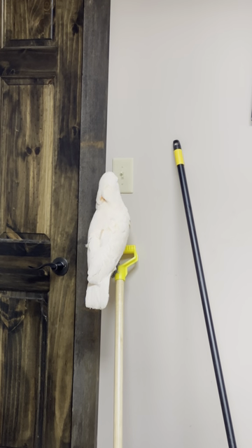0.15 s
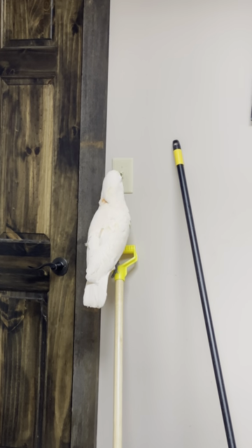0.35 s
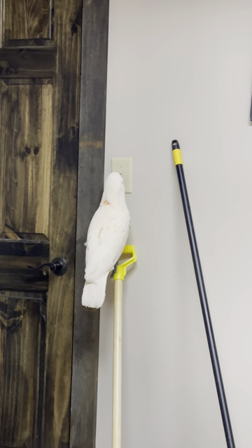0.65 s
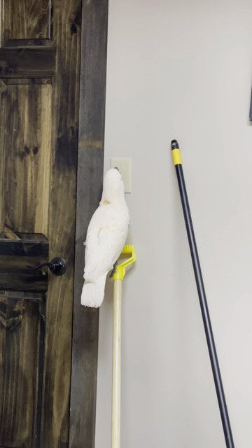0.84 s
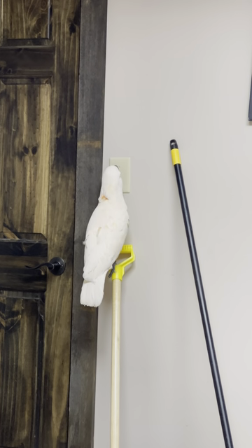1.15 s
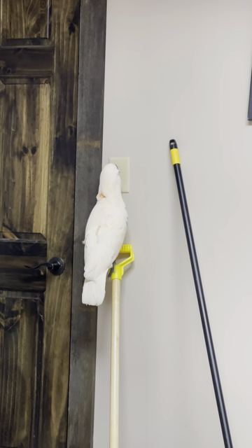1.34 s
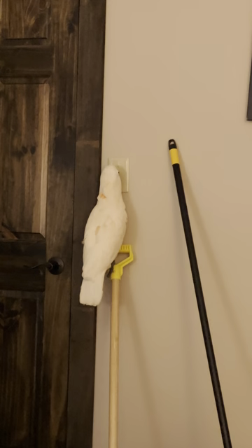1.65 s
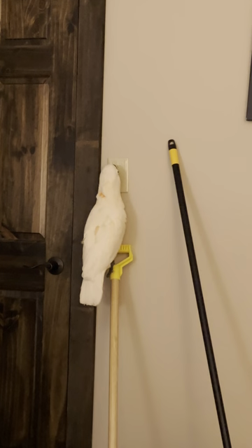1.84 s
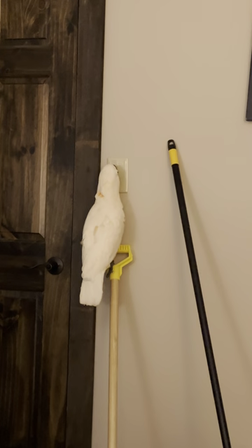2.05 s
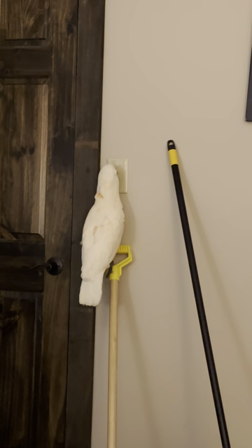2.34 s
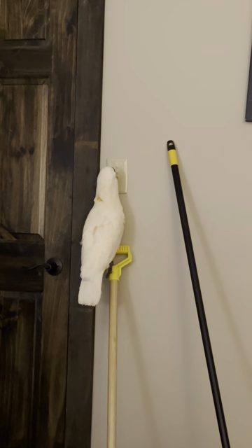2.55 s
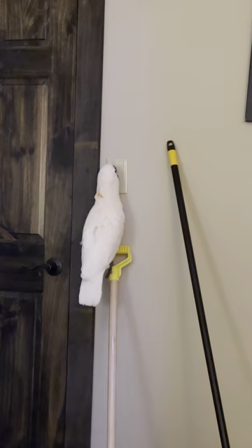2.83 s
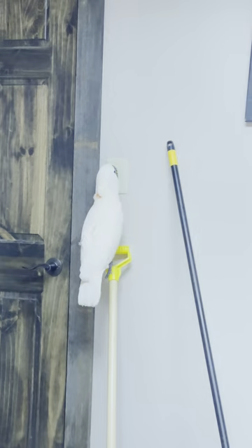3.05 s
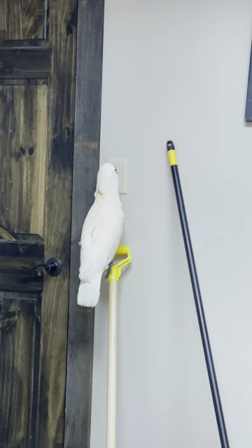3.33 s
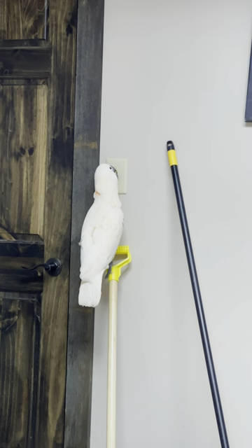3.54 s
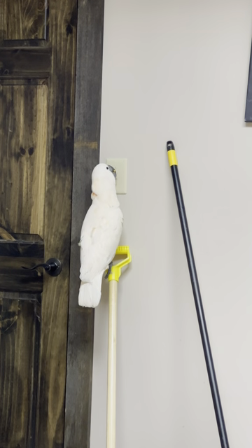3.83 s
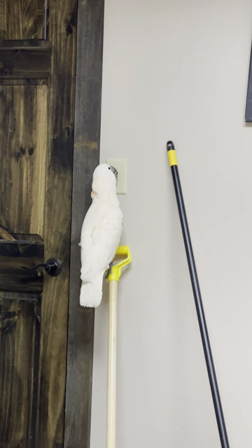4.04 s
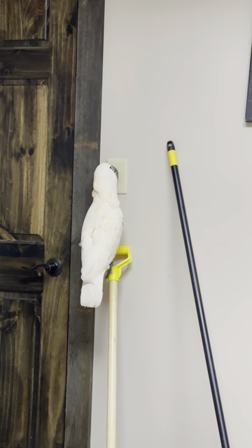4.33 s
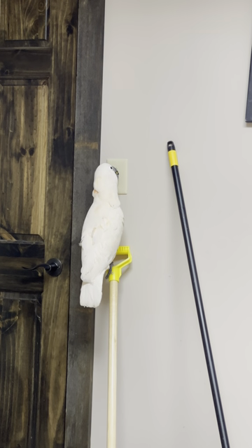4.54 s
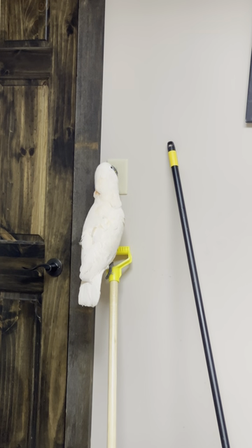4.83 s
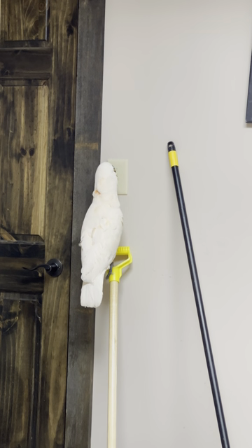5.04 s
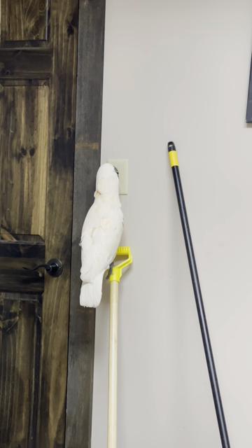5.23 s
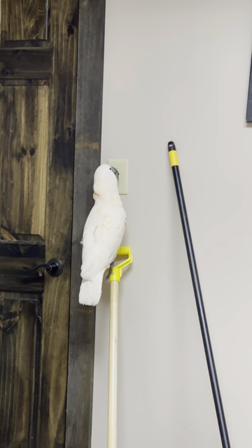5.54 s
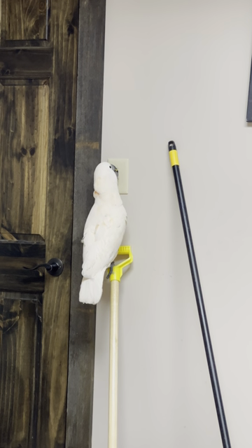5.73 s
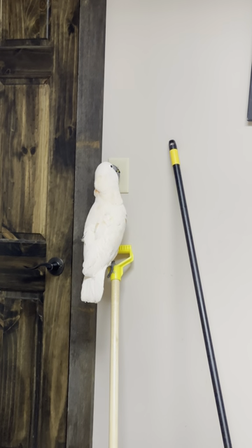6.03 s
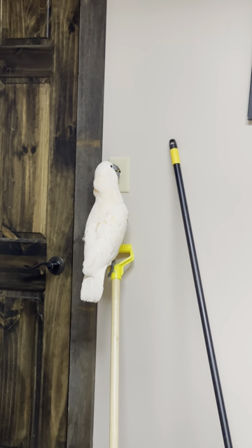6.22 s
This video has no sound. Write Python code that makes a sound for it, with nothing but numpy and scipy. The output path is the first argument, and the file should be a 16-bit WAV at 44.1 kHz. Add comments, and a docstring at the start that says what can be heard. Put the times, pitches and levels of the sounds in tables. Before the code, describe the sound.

A bird's beak clicks and scrapes on a plastic wall light switch in uneven runs, with sharp switch snaps and dull knocks indoors.

```python
"""A mop handle bumps the wall of a small bare room, over a low rumble and a thin electrical whine.
A cockatoo perched on it works a light switch with its beak, a few metres away. The beak clicks on the
plastic and the toggle knocks in the hollow wall; the spring cracks, and the toggle ticks against its
stop and once snaps right over. Each contact is a short force that excites the resonances of the parts
struck, heard as direct sound plus the reverberation of the room."""
import sys
import numpy as np
from scipy import signal
from scipy.fft import rfft, irfft, next_fast_len
from scipy.io import wavfile
from scipy.ndimage import uniform_filter1d

SR = 44100
rng = np.random.default_rng(int(sys.argv[2]) if len(sys.argv) > 2 else 0)


def log_audio(samples):
    """Write samples as a 16-bit WAV file to the path given in sys.argv[1]."""
    # one column per channel
    frames = np.atleast_2d(samples).T
    # limit to full scale, then quantise
    limited = np.clip(frames, -1, 1)
    pcm = np.round(limited * 32767).astype(np.int16)
    wavfile.write(sys.argv[1], SR, pcm)


N = 281358
SIZE, LEAD = 32768, 66  # samples in one contact, and in its fade-in before the strike
HZ = np.fft.rfftfreq(SIZE, 1 / SR)


def amp(db):
    """Amplitude ratio of a level in decibels."""
    return 10 ** (np.asarray(db) / 20)


def unit(x):
    """Normalisation to rms 1."""
    return x / np.sqrt(np.mean(x ** 2) + 1e-20)


def curve(points, hz):
    """Linear interpolation of (f/Hz, value) points on a log-frequency axis."""
    f, value = np.transpose(points)
    return np.interp(np.log(hz + 1), np.log(f + 1), value)


def add(mix, t, sound):
    """Superposition: a stereo contact joins the mix with its strike at t seconds."""
    part = mix[:, max(round(t * SR) - LEAD, 0):][:, :sound.shape[1]]
    part += sound[:, :part.shape[1]]


def minimum_phase(db):
    """Causality: phase follows from log gain by the Hilbert transform; a sharp start, then ringing."""
    log_gain = np.log(amp(np.maximum(db, -100)))
    mirrored = np.concatenate([log_gain, log_gain[-2:0:-1]])
    return np.exp(np.conj(signal.hilbert(mirrored)))[:len(db)]


def diffuse_field(size):
    """Spectrum of white stereo noise: sound from all sides is partly coherent at two points."""
    # likeness of left and right: f/Hz, coherence
    coherence = [(120, 1), (250, .93), (500, .82), (1100, .8), (1700, .98), (4200, .985), (4900, .8),
                 (5700, .985), (12000, .985)]
    a, b = rfft(rng.standard_normal((2, size)))
    alike = curve(coherence, np.fft.rfftfreq(size, 1 / SR))
    mid, side = a * np.sqrt((1 + alike) / 2), b * np.sqrt((1 - alike) / 2)
    return np.array([mid + side, mid - side])


def room(build_s=0.00054, bass_build_s=0.018, late_db=-27, late_t60=0.65):
    """Reverberation: reflections decay exponentially by band; the space beyond adds a longer tail."""
    # reverberation time: f/Hz, T60/s
    t60 = [(60, 0.42), (150, 0.4), (300, 0.29), (700, 0.27), (1500, 0.21), (3000, 0.22), (6000, 0.22),
           (12000, 0.11)]
    hz, t, bands = signal.stft(irfft(diffuse_field(SIZE)), SR, nperseg=256)
    hz = hz[:, None]
    late = amp(late_db - 60 * t / late_t60) / (1 + (hz / 2200) ** 2)
    bands *= amp(-60 * t / curve(t60, hz)) + late
    bands *= 1 - np.exp(-t / bass_build_s) / (1 + (hz / 450) ** 4)  # the bass builds up last
    tail = signal.istft(bands, SR, nperseg=256)[1][:, :SIZE]
    response = rfft(tail * (1 - np.exp(-np.arange(SIZE) / SR / build_s)))
    power = np.mean(abs(response) ** 2, 0)
    return response / np.sqrt(uniform_filter1d(power, size=60))  # even power over many room modes


def stick_slip(slip_s, catch, count=9):
    """Stick-slip force: an impact, then random catches of relative spread `catch`; whitened spectrum."""
    when, strength = rng.random(count), rng.standard_normal(count) * catch
    when[0], strength[0] = 0, 1
    force = rfft(np.bincount((when * slip_s * SR).astype(int), strength, minlength=SIZE))
    return force / np.sqrt(uniform_filter1d(abs(force) ** 2, size=90) + 1e-9)


def impact(spectrum, level_db, tilt, direct_db, pivot_hz, boom_db=0, room_db=0,
           slip_s=0, catch=0.62, ring=1, tone_hz=1000, tone_db=0, echo=0):
    """Source and filter: a force drives damped modes, heard directly and by reflection."""
    # resonances of the wall and switch plate: f/Hz, bandwidth/Hz, lift/dB
    modes = [(118, 8, 6), (153, 8, 8), (240, 12, 5), (348, 16, 9), (425, 12, 5), (479, 16, 7), (572, 16, 4),
             (667, 14, 6), (728, 16, 6), (820, 16, 5), (984, 12, 4), (1021, 16, 7), (1190, 50, 6),
             (1334, 20, 4), (1385, 16, 6), (1632, 20, 6), (1820, 50, 6), (2200, 28, 5), (2379, 27, 6),
             (2700, 34, 6), (3050, 36, 5), (4050, 90, 6)]
    # direct path past the bird's body: f/Hz, gain/dB
    direct_path = [(100, -5.5), (600, -8.5), (1400, 0), (2500, -23), (5000, 1.5), (10000, -5)]
    lift = sum((amp(db) - 1) / (1 + (2 * (HZ - hz) / width) ** 2) for hz, width, db in modes)
    colour_db = curve(spectrum, HZ) + ring * 20 * np.log10(1 + lift)
    colour_db += tilt * np.clip(np.log2((HZ + 1) / pivot_hz), -2, 2)  # harder is brighter
    colour_db += boom_db / (1 + (HZ / 260) ** 4)  # a deep push flexes the whole wall panel
    colour_db += tone_db / (1 + ((HZ / tone_hz - 1) / 0.061) ** 2)  # each spot has its own pitch
    direct = amp(direct_db + curve(direct_path, HZ))
    comb = 1 + echo * np.exp(-2j * np.pi * HZ * .0035)  # reflection off the nearest surface
    vibration = minimum_phase(colour_db) * stick_slip(slip_s, catch)
    sound = irfft(vibration * (direct * comb + amp(room_db) * room()))
    fade_in = np.sin(np.pi / 2 * np.minimum(np.arange(SIZE) / LEAD, 1)) ** 2
    fade_out = np.minimum(np.linspace(4, 0, SIZE), 1) ** 2
    sound = np.roll(sound, LEAD, axis=1) * fade_in * fade_out
    onset_rms = np.sqrt(np.mean(sound[:, :SR // 40] ** 2))
    return amp(level_db) * sound / onset_rms


def background(rumble_db=-54, fall_db_per_s=0.82, whine_db=-72):
    """Filtered noise: a slowly sinking house rumble, steady hiss and a narrow-band electrical whine."""
    # spectra of the room noise and of the whine: f/Hz, level/dB
    noise_spectrum = [(20, -8), (32, -19.5), (48, 3), (80, -2.5), (140, -2), (240, -10), (400, -20),
                      (800, -28), (1400, -40), (2500, -47.5), (4500, -50), (9000, -53.5), (11500, -99)]
    whine_spectrum = [(9400, -31), (9750, -4.5), (10020, 4), (10180, 20.5), (10340, 15.5), (10500, -7.5),
                      (10800, -33.5)]
    hz, t = np.fft.rfftfreq(N, 1 / SR), np.arange(N) / SR
    noise = unit(irfft(diffuse_field(N) * amp(curve(noise_spectrum, hz)), N))
    rumble = irfft(rfft(noise) / (1 + (hz / 400) ** 4), N)
    hiss = noise - rumble
    level_db = rumble_db - fall_db_per_s * t
    whine_band = amp(curve(whine_spectrum, hz)) * (hz > whine_spectrum[0][0])
    whine = unit(irfft(diffuse_field(N) * whine_band, N))
    return amp(level_db) * rumble + amp(level_db.mean()) * hiss + amp(whine_db) * whine


def perch():
    """Impact excitation: the mop handle bumps the wall and sounds mainly low resonances."""
    # bumps: t/s, level/dB, tilt/(dB/octave)
    bumps = [(.016, -39.5, 1)]
    # handle against wall: f/Hz, level/dB
    spectrum = [(50, -24), (110, 5), (165, -12), (220, 7), (290, 5.5), (370, -5.5), (450, -2), (570, -5),
                (700, -16), (1200, -22.5), (1600, -19.5), (2000, -22.5), (2360, -17.5), (2800, -22.5),
                (3330, -19), (4000, -28), (7500, -37), (12000, -51)]
    out = np.zeros((2, N))
    for t, db, tilt in bumps:
        add(out, t, impact(spectrum, db, tilt, direct_db=-5, pivot_hz=900, slip_s=.012, ring=0.17))
    return out


def ping():
    """Free vibration: a small hard part rings at its own frequencies, nearly dry."""
    # pings: t/s, level/dB, tilt/(dB/octave)
    strikes = [(5.413, -57.5, 0)]
    # resonances of the part: f/Hz, level/dB
    spectrum = [(150, -31), (350, 12.5), (800, -7), (1100, -7), (1350, 0.5), (1620, 6), (1900, -3),
                (2500, -12), (3500, -26), (4020, -2), (4500, -22), (5500, -15), (6100, -37), (6800, -21),
                (8500, -43), (12000, -52)]
    out = np.zeros((2, N))
    for t, db, tilt in strikes:
        add(out, t, impact(spectrum, db, tilt, direct_db=-6.5, pivot_hz=2500,
                           room_db=-16, slip_s=0.00079, ring=0))
    return out


def knock(db, hardness):
    """Panel radiation: the toggle seats in the hollow wall; a harder push adds treble and boom."""
    # dull knock of the wall: f/Hz, level/dB
    spectrum = [(50, -30), (105, -1.5), (155, 6.5), (200, 3), (270, -4), (350, -0.5), (480, -0.5),
                (720, -4.5), (950, -12.5), (1200, -18), (1500, -39), (3000, -40.5), (12000, -103)]
    return impact(spectrum, db - 10.5, tilt=3.5 + 0.46 * hardness, direct_db=-3, pivot_hz=613,
                  boom_db=5.5 + 0.9 * hardness, slip_s=.007, catch=.7, ring=0.87)


def spot_hz(median_hz=2520, spread_octaves=0.36):
    """Log-normal scatter: the pitch of a chance spot on the toggle."""
    return median_hz * 2 ** (spread_octaves * rng.standard_normal())


def click(db, hardness, hz, slip_s=.01):
    """Stick-slip friction: the beak strikes the plastic, then catches nearly as hard while it slips."""
    # beak on plastic: f/Hz, level/dB
    spectrum = [(100, -19.5), (700, -1.5), (1400, 1.5), (2000, 7.5), (3000, 3), (4200, -1.5), (6000, -10),
                (8000, -19), (12000, -75)]
    return impact(spectrum, db - 10.5, hardness, direct_db=-1, pivot_hz=2600,
                  slip_s=slip_s, catch=0.81, tone_hz=hz, tone_db=7)


def graze(db, hardness, hz):
    """Contact time falls with hardness: a hard graze is a short tick, a soft one a longer scrape."""
    return click(db, hardness, hz, slip_s=0.011 * 2 ** (-hardness / 12.5))


def nibbles(count=7, span_s=(.6, 6.2)):
    """Light friction: faint grazes at uneven moments while the bird feels for a grip."""
    out = np.zeros((2, N))
    for k in range(count):
        t = np.interp(k + rng.random(), [0, count], span_s)
        add(out, t, graze(db=rng.normal(-74, 2), hardness=-1.2, hz=spot_hz()))
    return out


def beak():
    """Structure-borne sound: each touch of the beak on the plastic also knocks in the wall."""
    # shoves on the toggle: t/s, relative click level/dB, relative knock level/dB, hardness/(dB/octave)
    shoves = [(.457, -82, -38, -5.5), (.636, -61, -38, -1), (0.745, -49.5, -38, -0.5),
              (0.958, -51, -38.5, -3), (1.148, -62, -46.5, -6), (1.271, -64.5, -53, 10),
              (1.483, -60, -47, -20), (1.73, -53.5, -40, -13), (1.795, -55, -44, -9.5),
              (1.915, -45, -44, -14.5), (2.008, -54.5, -45, -6.5), (2.274, -70, -46, -21),
              (2.758, -50.5, -55, -5.5), (2.828, -51, -40, -3), (3.307, -54.5, -33, 0.5),
              (3.5, -60, -43.5, -14.5), (3.817, -50.5, -41.5, -4), (3.871, -48.5, -48, -4),
              (3.955, -50.5, -48.5, 0), (4.009, -56, -37, -7.5), (4.195, -49, -43.5, -5.5),
              (4.37, -51, -30.5, -1), (5.809, -52.5, -41.5, 0), (6.259, -58, -42.5, -10)]
    # grazes on the plate: t/s, relative level/dB, hardness/(dB/octave), f/Hz of the spot
    grazes = [(.158, -66, 10.5, 4400), (.802, -57, 2, 4400), (.876, -56.5, -5.5, 2370),
              (1.057, -63.5, -5.5, 2400), (1.86, -56.5, -6.5, 2900), (2.329, -55.5, -5, 2500),
              (2.437, -57.5, -14.5, 2600), (2.492, -58, 9.5, 4700), (2.738, -57, -3, 2530),
              (2.794, -53.5, -5, 2640), (2.887, -55.5, -0.5, 4760), (3.113, -55, -.5, 3640),
              (3.142, -61, 5, 2360), (3.198, -66.5, -5, 2400), (3.287, -62, 1, 4900),
              (4.22, -53, -2.5, 2460), (4.336, -51.5, 0.5, 3450), (5.496, -57, -11.5, 2500),
              (5.574, -66, -3.5, 2780), (6.168, -68, 1.5, 2600)]
    out = np.zeros((2, N))
    for t, click_db, knock_db, hardness in shoves:
        add(out, t, click(click_db, hardness, spot_hz()) + knock(knock_db, hardness))
    for t, db, hardness, hz in grazes:
        add(out, t, graze(db, hardness, hz) + knock(db + 4, hardness))
    return out


def crack(db, tilt, hz, lift_db):
    """A brief force has a broad spectrum: one sharp strike of the spring inside the switch."""
    # strike of the spring: f/Hz, level/dB
    spectrum = [(100, -20), (1000, -11), (2500, 0.5), (4300, -2), (5600, -2), (7000, -1), (9000, -4.5),
                (10200, 1), (11500, -4), (12500, -16)]
    return impact(spectrum, db - 9.5, tilt, direct_db=-7.5, pivot_hz=6050,
                  slip_s=0.0018, ring=.6, tone_hz=hz, tone_db=lift_db)


def spring(wall_lag_s=0.002995):
    """Release of elastic energy: the spring cracks, rattles and jolts the wall a moment later."""
    # snaps: t/s, relative level/dB, tilt/(dB/octave), f/Hz of the pitch, its lift/dB,
    # rattle offset/dB, relative knock level/dB, knock hardness/(dB/octave)
    snaps = [(1.552, -38.5, -1.5, 4060, 3.5, 3, -42.5, -11), (4.9, -41.5, -0.5, 4770, 15.5, -1, -35.5, 6.5),
             (5.157, -45, -5, 2980, 5.5, 1, -34, -20), (5.726, -51, -4, 5100, 10, 5.5, -37, -3),
             (5.937, -45, 1.5, 5150, 9, -19, -35, -1.5)]
    # release and rebound, relative to the crack: t/s, level/dB, tilt/(dB/octave)
    rattle = [(-.003, -3.5, -2.5), (.01, -4, -5.5)]
    out = np.zeros((2, N))
    for t, db, tilt, hz, lift_db, rattle_db, knock_db, hardness in snaps:
        add(out, t, crack(db, tilt, hz, lift_db))
        add(out, t + wall_lag_s, knock(knock_db, hardness))
        for offset_s, step_db, tilt_step in rattle:
            add(out, t + offset_s, crack(db + rattle_db + step_db, tilt + tilt_step, hz, lift_db))
    return out


def toggle_ticks():
    """Impulse response: the toggle meets its stop without slipping and barely rings the wall."""
    # ticks: t/s, level/dB, tilt/(dB/octave), reverberation gain/dB
    ticks = [(.590, -57, -6.5, 2), (1.149, -58, 1, 2.5), (1.398, -63, -10.5, -3), (1.860, -61, 2.5, -0.5),
             (2.073, -58.5, 2, -0.5), (5.1561, -43, 0.5, 2.5), (5.9359, -42.5, 3.5, 0.5)]
    # toggle against stop: f/Hz, level/dB
    spectrum = [(80, -0.5), (400, -12), (780, -2), (1030, -11.5), (1230, 1), (1400, -0.5), (1560, -6),
                (1800, -14.5), (2900, -13), (4200, -28), (7000, -41), (11000, -54), (13000, -53)]
    out = np.zeros((2, N))
    for t, db, tilt, room_db in ticks:
        add(out, t, impact(spectrum, db, tilt, direct_db=1, pivot_hz=1470,
                           room_db=room_db, ring=0.091, echo=0.33))
    return out


def toggle_flip(zing_db=-41.5, zing_lead_s=0.00079):
    """Snap-through: the spring zings, then the toggle flips over and rings wall and room strongly."""
    # flips: t/s, level/dB, tilt/(dB/octave)
    flips = [(1.5538, -36, 1)]
    # spectra of the spring's dry zing and of the toggle landing: f/Hz, level/dB
    zing = [(3000, -71), (7000, -14), (9000, -3), (10300, 10.5), (11500, -28), (12500, 2)]
    landing = [(70, 0), (150, -5.5), (240, -10.5), (340, 2), (470, 0.5), (560, -1), (730, 5.5), (880, 2),
               (1020, 2.5), (1300, -12), (1850, -5.5), (3000, -11), (4000, -21), (4600, -29), (7000, -18),
               (12500, -31)]
    out = np.zeros((2, N))
    for t, db, tilt in flips:
        add(out, t - zing_lead_s, impact(zing, zing_db, tilt=0, direct_db=8, pivot_hz=10000,
                                         room_db=-10, slip_s=0.0012, ring=0))
        add(out, t, impact(landing, db, tilt, direct_db=-6, pivot_hz=1000, ring=1.26))
    return out


def scene():
    """Superposition of room noise, perch, switch and beak, with softened ends."""
    mix = background() + perch() + spring() + toggle_ticks() + ping() + toggle_flip()
    mix += beak() + nibbles()
    return mix * signal.windows.tukey(N, .001)


def record(dry, cutoff_hz=12200):
    """Two-point pickup: the microphone ports differ in level and phase; a low-pass limits the band."""
    # left minus right: f/Hz, level/dB
    balance = [(140, 0), (280, 1), (550, 3.6), (1050, 3), (1800, .1), (12000, .1)]
    # lead of the left port: f/Hz, phase/rad
    phase = [(0, 0), (700, 0), (1460, -.15), (2670, .7), (4130, .8), (4900, 3.14), (5600, 6.1), (6460, 6.9),
             (8350, 8.6), (9250, 9.42), (10250, 10.5), (12300, 12.6)]
    size = next_fast_len(N + SIZE)
    hz = np.fft.rfftfreq(size, 1 / SR)
    left = amp(curve(balance, hz) / 2) * np.exp(.5j * curve(phase, hz))
    ports = irfft(rfft(dry, size) * np.array([left, 1 / left]), size)[:, :N]
    low_pass = signal.firwin(255, cutoff_hz, window=("kaiser", 9), fs=SR)
    return signal.oaconvolve(ports, low_pass[None], "same", axes=1)


dry = scene()
out = record(dry)
log_audio(out)
```